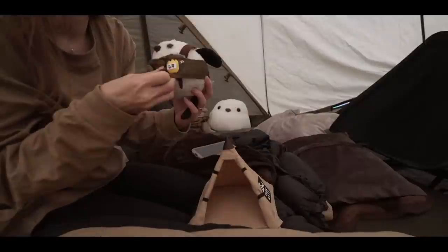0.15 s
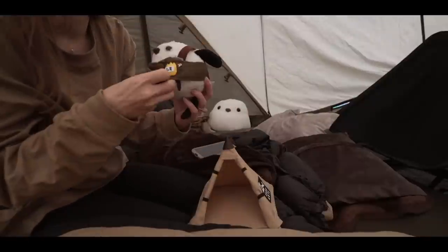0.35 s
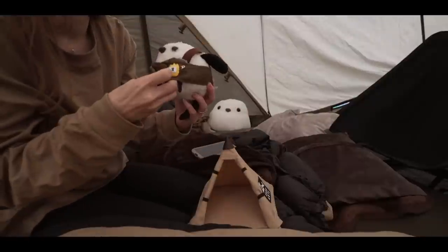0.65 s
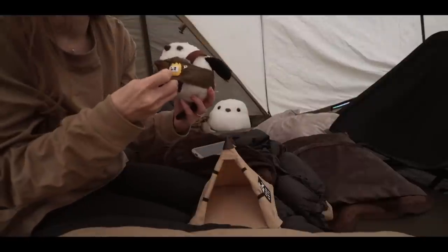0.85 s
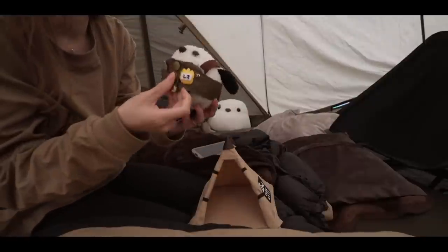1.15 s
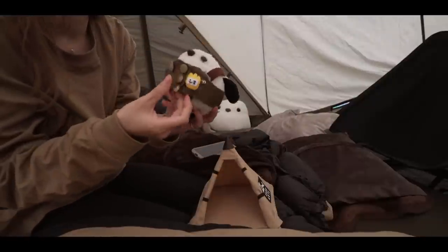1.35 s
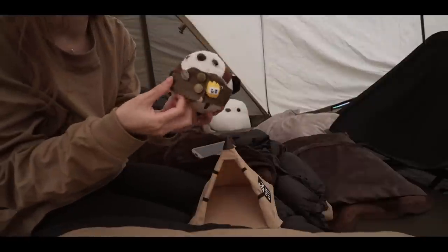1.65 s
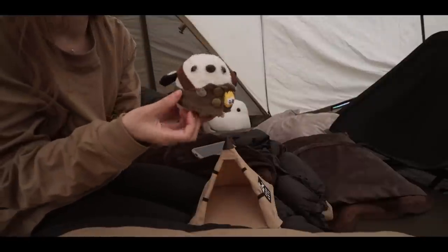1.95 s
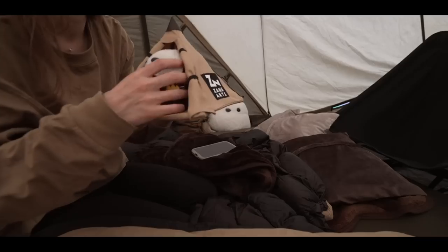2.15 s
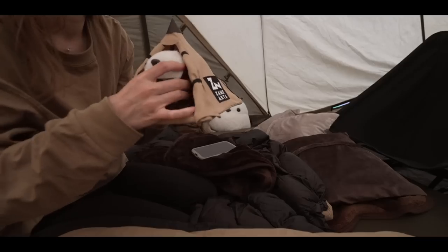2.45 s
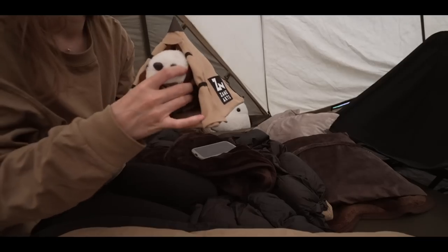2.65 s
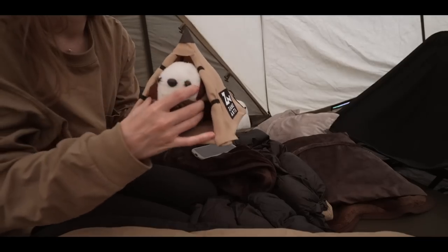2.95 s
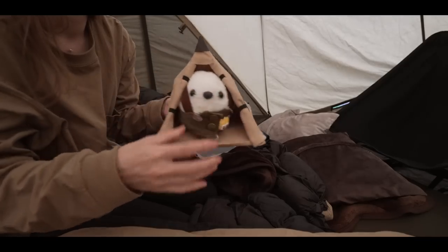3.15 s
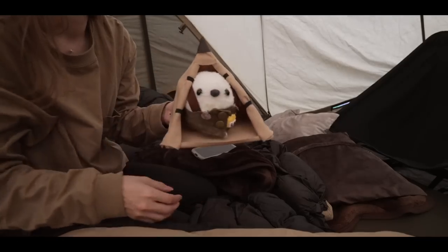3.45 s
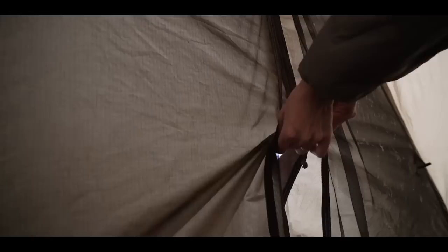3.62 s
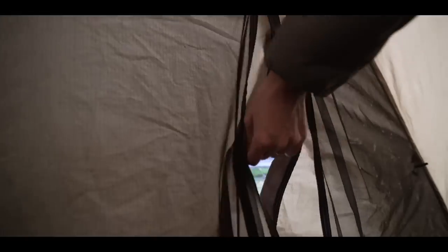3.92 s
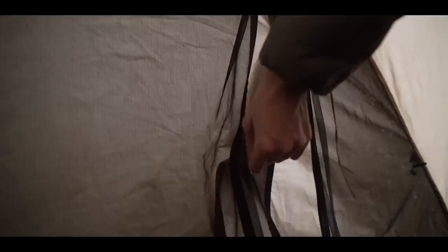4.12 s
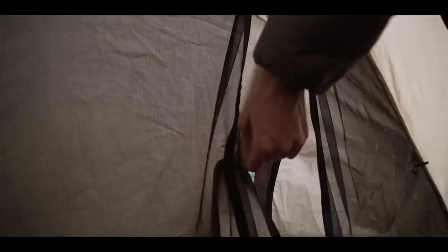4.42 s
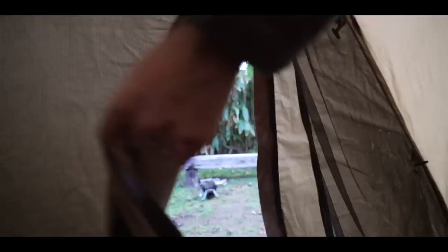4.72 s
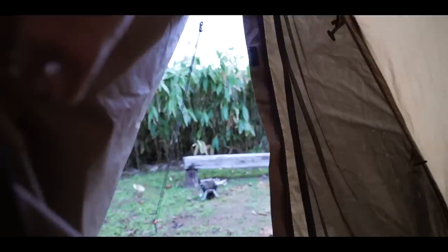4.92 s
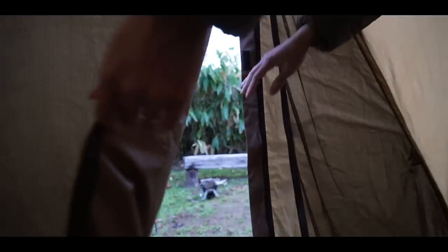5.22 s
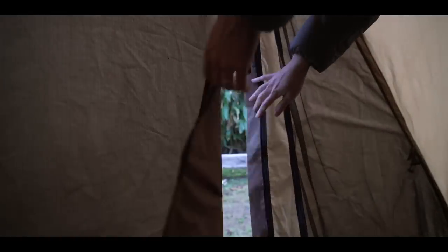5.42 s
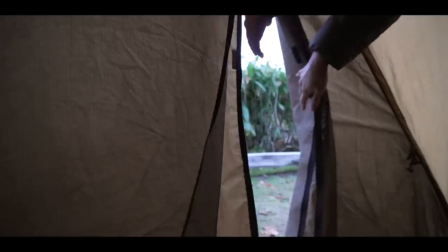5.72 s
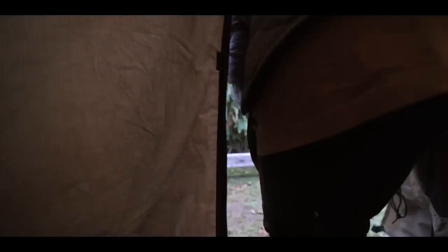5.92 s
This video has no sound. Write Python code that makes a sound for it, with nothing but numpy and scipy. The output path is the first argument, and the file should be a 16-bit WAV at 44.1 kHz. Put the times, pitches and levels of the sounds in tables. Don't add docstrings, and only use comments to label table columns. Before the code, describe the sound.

From 0 to 3.65 s it is very quiet inside a tent: a dull distant hum of traffic and leaves, faint soft rubs of fleece and sleeve, strongest at the very start and near 3.5 s, and one crisp plastic fastener snap at 0.76 s. Then the perspective cuts close to the door. From 3.67 s a few dull zipper knocks quicken into a buzz that climbs in pitch, peaks around 4.0 to 4.2 s with slider chatter and sharp snags, then drops and stops near 4.4 s. A metal pull tab jingles thinly at the start and end. At 4.5 to 4.65 s the flap is torn open in a loud cluster of nylon cracks and hiss. Afterwards sparse crease pops continue, busier at 5.4 to 5.7 s, with a brushing slide at 5.8 s. Low wind gusts flutter and thump to the end at about 6 s.

```python
import sys
import numpy as np
from scipy import signal
from scipy.io import wavfile
from scipy.ndimage import uniform_filter1d

SR = 44100
rng = np.random.default_rng(int(sys.argv[2]) if len(sys.argv) > 2 else 0)


def unload_audio(sound):
    columns = np.transpose(np.atleast_2d(sound))
    steps = np.round(np.clip(columns, -1, 1) * 32767)
    wavfile.write(sys.argv[1], SR, steps.astype(np.int16))


def volts(x):
    e = np.asarray(x, float) / 20
    return 10 ** e


N = 267687
T = np.arange(N) / SR
DOOR_S = 3.652

# time_s, tooth_rate_hz, pull_db, lowest_multiple_db
ZIP_STROKES = [
    [(3.745, 215.2, -8, 2.5), (3.766, 316.3, -6, 8.5), (3.782, 394, -16, -1), (3.81, 496, -6.5, 8),
     (3.856, 568, 2.5, -8), (3.888, 645.3, 3.5, 7.5), (3.96, 682, 6.5, -4.5), (3.998, 775.7, 0.5, 13),
     (4.008, 822.5, -3, -4)],
    [(4.008, 819.3, 0, -8), (4.034, 873, -1, 9.5), (4.055, 899, -0.5, -1), (4.068, 823.3, -4, 0),
     (4.088, 830.7, -1.5, 8.5), (4.15, 888.4, 4.5, -11.5), (4.174, 865.4, 4, 7), (4.2, 794, 5.5, -6)],
    [(4.2, 794, -1, 3), (4.218, 721.3, 4, -10), (4.244, 615.5, -1.5, 0.5), (4.266, 554, -6.5, 8),
     (4.294, 519.7, -1, 2.5), (4.314, 399, -9, -1), (4.33, 301.5, -7, 3.5), (4.37, 184, -4.5, -13)],
]
# time_s, crumple_db
NYLON_MOTION = [(3.652, -45.5), (3.78, -33.5), (3.85, -35.5), (3.88, -30.5), (3.97, -29.5), (4.15, -39.5),
                (4.4, -35), (4.413, -51), (4.492, -54), (4.497, -16.5), (4.52, -26), (4.62, -24.5),
                (4.69, -33.5), (4.9, -43.5), (5.33, -40.5), (5.38, -39), (5.8, -39.5), (6.07, -42.5)]


def curve(table, column, off=-120.):
    rows = np.array(table)
    return np.interp(T, rows[:, 0], rows[:, column], off, off)


def strokes(tables, column):
    return np.max([curve(table, column) for table in tables], axis=0)


def swells(rows, rise_s, fall_s, index=2):
    total = 0
    for row in rows:
        before = (row[0] - T) / rise_s
        after = np.maximum(T - row[0] - row[1], 0) / fall_s
        total = total + volts(row[index]) * np.exp(-np.maximum(before, after))
    return total


def unit(x):
    return x / np.sqrt(np.mean(x ** 2))


def ring(x, hz, width):
    centre = min(hz, .45 * SR)
    return signal.lfilter(*signal.iirpeak(centre, hz / width, fs=SR), x)


def walk(rate):
    k = int(SR / rate)
    held = np.repeat(rng.standard_normal(N // k + 1), k)
    return 1.3 * uniform_filter1d(uniform_filter1d(held, k), k)[:N]


def grains(rate, spread_db):
    chance, side, size = rng.random((3, N))
    return unit((chance < rate / SR) * np.sign(side - .5) * volts(-spread_db * np.log(size + .02)))


def coloured(colour, ticks, share, flicker_db, flicker_rate):
    hz, db = np.transpose(colour)
    out = 0
    for f in hz[0] * 2 ** np.arange(1 / 6, np.log2(hz[-1] / hz[0]), 1 / 3):
        edges = [f * 2 ** (-1 / 6), f * 2 ** (1 / 6)]
        sos = signal.butter(2, edges, "bandpass", fs=SR, output="sos")
        drive = np.sqrt(1 - share) * rng.standard_normal(N) + np.sqrt(share) * ticks
        level = np.interp(np.log(f), np.log(hz), db) + flicker_db * walk(flicker_rate)
        out = out + volts(level) * signal.sosfilt(sos, drive)
    return unit(out)


def rumble(hz, width):
    return unit(ring(ring(rng.standard_normal(N), hz, width), hz, width))


def outdoors():
    # pitch_hz, level_db (per Hz)
    far_colour = [(12, -11), (20, -1), (43, -17), (68, 2), (116, 2.5), (138, -7.5), (172, -4.5),
                  (216, -10.5), (319, -9.5), (718, -6.5), (1060, -9.5), (1400, -12.5), (2320, -24.5),
                  (3950, -27.5), (16000, -95)]
    # start_s, hold_s, level_db
    gust_times = [
        (3.7, 0.48, -37),
        (4.51, 0.2, -33),
        (4.92, 0.25, -36),
        (5.46, 0.15, -39.5),
        (5.72, 0.24, -38),
        (5.84, .03, -50),
    ]
    at_door = T > DOOR_S
    far = coloured(far_colour, np.zeros(N), 0, flicker_db=.9, flicker_rate=7)
    far = far * volts(-50.5 + 0.94 * at_door)
    flap_hz = 17.5 * (1 + .12 * walk(6))
    flutter = np.sin(2 * np.pi * np.cumsum(flap_hz) / SR) * volts(1.5 * walk(12))
    wind = flutter + volts(-14.5) * rumble(33, 22)
    gusts = swells(gust_times, rise_s=0.036, fall_s=0.11) * wind
    thump = volts(curve(NYLON_MOTION, 1) - 15.5) * rumble(115, 60)
    door_hum = volts(-52) * at_door * rumble(114, 16)
    return far + gusts + thump + door_hum


def hands():
    # start_s, hold_s, level_db
    rubs = [(0.0, 0.017, -48), (.05, .095, -55), (.368, 0.016, -63.5), (.5, .03, -66), (1.0, .08, -70.5),
            (1.245, .008, -68), (1.482, 0.006, -60.5), (2.025, 0.11, -59.5), (2.28, 0.0089, -59.5),
            (2.33, 0.061, -65.5), (2.46, 0.038, -67), (2.548, 0.022, -57.5), (2.786, .005, -64.5),
            (2.84, 0.056, -69), (3.04, 0.1, -58), (3.53, 0.017, -50.5), (3.58, 0.057, -58)]
    # pitch_hz, level_db (per Hz)
    cloth_colour = [(880, -6), (1500, -6), (1640, -5), (5120, -13), (6430, -14), (8920, -20.5),
                    (13400, -22.5), (16000, -33)]
    cloth = coloured(cloth_colour, grains(400, 3.0), .1, flicker_db=1.5, flicker_rate=20)
    return swells(rubs, rise_s=0.044, fall_s=0.01) * cloth


def snap():
    # time_s, peak_db
    click = [
        (0.758, -5),
    ]
    # pitch_hz, level_db, t60_s (time to fade by 60 dB)
    plastic_modes = [(1450, 9.5, 0.0035), (2590, 10.5, 0.0045), (4170, 15.5, 0.0031), (5530, 6, 0.0036),
                     (7100, -1, 0.003), (9900, -3, 0.0037), (13000, -12, 0.0034)]
    # pitch_hz, width_hz, level_db
    wall_tones = [(1800, 1100, -1), (3240, 750, 5), (4360, 600, 10), (6750, 970, -1), (10400, 2500, -8)]
    s, db = click[0]
    tick = np.zeros(N)
    for lag_s, gain in [(.0008, 0.34), (.00149, 1), (.00218, 0.15)]:
        tick[int((s + lag_s) * SR)] += gain
    modes = sum(volts(g) * ring(tick, hz, 2.4 / t60) * t60 for hz, g, t60 in plastic_modes)
    modes = signal.lfilter(*signal.butter(1, 8000, fs=SR), modes)
    noise = rng.standard_normal(N)
    tail = unit(sum(volts(g) * ring(noise, hz, width) for hz, width, g in wall_tones))
    since_s = np.maximum(T - s, 0)
    answer = volts(-29) * (since_s > .005) * np.exp(-since_s / 0.016) * tail
    return volts(db) * (modes / abs(modes).max() + answer)


def nylon():
    # pitch_hz, level_db (per Hz)
    body_colour = [(110, -56), (200, -2), (500, 2.5), (900, 2), (1600, -1.5), (2700, -9), (4200, -16.5),
                   (7000, -54)]
    # pitch_hz, level_db (per Hz)
    hiss_colour = [(1180, -43), (2000, -58), (2680, 6), (4920, 0.5), (5980, -3.5), (13300, -10.5),
                   (16100, -8), (16500, -53)]
    # start_s, hold_s, crumple_db, hiss_db
    yanks = [
        (4.015, .004, -27, -39),
        (4.4, 0.0025, -21.5, -27),
        (4.637, 0.0087, -18.5, -19),
    ]
    # start_s, hold_s, hiss_db
    slides = [
        (4.0, 0.088, -35.5),
        (4.18, 0.018, -35.5),
        (4.37, 0.019, -45),
        (4.52, .12, -37),
        (4.7, 0.19, -59),
        (4.9, 0.19, -63),
        (5.17, 0.036, -50.5),
        (5.35, .22, -58),
        (5.822, 0.074, -37.5),
        (5.97, 0.072, -49),
    ]
    ticks = unit(grains(410, 4.4) * volts(2 * walk(90)))
    body = coloured(body_colour, ticks, 0.76, flicker_db=2.04, flicker_rate=30)
    hiss = coloured(hiss_colour, ticks, 0.022, flicker_db=0.22, flicker_rate=30)
    moved = volts(curve(NYLON_MOTION, 1))
    yank_rise_s, yank_fall_s = .003, .004
    crumple = moved + swells(yanks, yank_rise_s, yank_fall_s)
    slide = swells(slides, rise_s=0.0013, fall_s=0.038)
    slide = slide + swells(yanks, yank_rise_s, yank_fall_s, index=3)
    return crumple * body + (volts(-12) * moved + slide) * hiss


def knocks(teeth):
    # time_s, peak_db
    first_teeth = [
        (3.6533, -44),
        (3.6735, -22),
        (3.7021, -24),
        (3.7185, -30),
        (3.727, -19.5),
        (3.7357, -20),
        (3.7405, -19),
    ]
    knock_hz, width_hz, fused_s = 850, 950, 3.778
    train = volts(-25) * teeth * (T > ZIP_STROKES[0][0][0]) * (T < fused_s)
    for s, db in first_teeth:
        train[int(s * SR)] += volts(db)
    soft = signal.butter(2, 1.23 * knock_hz, fs=SR)
    shape = signal.lfilter(*soft, ring(signal.unit_impulse(512), knock_hz, width_hz))
    return signal.fftconvolve(train, shape / shape.max())[:N]


def zipper():
    # pitch_hz, level_db
    tape = [(200, -28.5), (500, -33.5), (660, -32.5), (880, -33), (1300, -36.5), (1750, -39.5),
            (2050, -42.5), (3400, -42.5)]
    # start_s, hold_s, level_db
    chatter_times = [
        (3.86, 0.11, -38.5),
        (4.04, .28, -36),
    ]
    # pitch_hz, width_hz, level_db
    slider_tones = [(1360, 140, 10), (3610, 650, 12), (4840, 850, 9), (7500, 2000, -37), (12200, 4400, -22)]
    rate_hz = np.maximum(strokes(ZIP_STROKES, 1), 110)
    phase = np.cumsum(rate_hz * (1 + .025 * walk(200) + .01 * walk(50))) / SR
    pull_db = strokes(ZIP_STROKES, 2)
    tape_hz, tape_db = np.transpose(tape)
    buzz = 0
    for k in range(6):
        hz = (k + 1) * rate_hz
        db = pull_db + np.interp(np.log(hz), np.log(tape_hz), tape_db)
        db = db - 14 * np.maximum(np.log2(hz / tape_hz[-1]), 0)
        db = db - 3.0 * max(k - 3, 0)
        if k == 0:
            db = db + strokes(ZIP_STROKES, 3)
        waver_db = (.8 + .45 * k) * walk(40) + (1.5 + .4 * k) * walk(250)
        buzz = buzz + volts(db + waver_db) * np.sqrt(2) * np.sin(2 * np.pi * (k + 1) * phase + k)
    chance = rng.standard_normal((2, N))
    tooth = (np.diff(np.floor(phase), prepend=0) > 0) * volts(3.5 * chance[0])
    puff = np.exp(-(phase % 1) / 0.3) * chance[1]
    knock = .5 * unit(tooth) + unit(puff)
    chatter = 0
    for hz, width, db in slider_tones:
        chatter = chatter + volts(db) * ring(knock if hz < 4500 else puff, hz, width)
    chatter = swells(chatter_times, rise_s=.06, fall_s=0.049) * unit(chatter)
    return buzz + knocks(tooth) + chatter


def tab():
    # start_s, hold_s, low_ring_db, high_rings_db
    jingles = [
        (3.74, 0.014, -54, -47),
        (3.77, 0.034, -57, -75),
        (4.31, 0.031, -55, -42),
        (4.92, .006, -65, -52),
        (5.062, .008, -69, -66),
    ]
    # pitch_hz, width_hz, level_db
    metal_tones = [(6530, 80, 12), (10930, 120, -8.5), (15650, 120, -2)]
    low, *high = [volts(db) * unit(ring(grains(270, 2.8), hz, width)) for hz, width, db in metal_tones]
    rise_s, fall_s = 0.0083, 0.02
    low_gain = swells(jingles, rise_s, fall_s)
    high_gain = swells(jingles, rise_s, fall_s, index=3)
    return low_gain * low + high_gain * sum(high)


def cracks():
    # time_s, peak_db, pitch_hz, brightness_db
    snags = [(3.794, -1.5, 1450, -20.5), (3.8683, -11.5, 1200, -15.5), (3.8769, -12, 1020, -15),
             (3.9785, -15, 1450, -28), (4.0015, -4.5, 1230, -10), (4.0168, -7.5, 1190, -8),
             (4.019, -15, 2220, -16), (4.033, -5, 1450, -10), (4.0637, -1.5, 1430, -15),
             (4.0759, -7.5, 1330, -10), (4.119, -21, 1230, -10), (4.1834, -11, 1450, -10),
             (4.1971, -7.5, 1175, -14), (4.296, -15.5, 1270, -7), (4.3106, -12, 1580, -14),
             (4.3721, -7, 2403, -29), (4.377, -15, 2320, -9), (4.3851, -10.5, 1567, -9),
             (4.395, -6.5, 1260, -15.5), (4.3994, -15, 1540, -17)]
    # time_s, peak_db, pitch_hz, brightness_db
    tears = [(4.4507, -31, 1810, -5), (4.4954, -5, 2070, -14.5), (4.4995, -0.5, 3030, -29),
             (4.5012, 1.5, 1570, -8.5), (4.5061, 2, 1790, -9), (4.5091, -1, 1510, -16.5),
             (4.5257, -14, 1520, -33), (4.5362, -2, 1900, -13), (4.5406, -6, 688, -11),
             (4.5513, -12, 600, -11), (4.5716, -7, 890, -14), (4.589, -12, 1400, -11.5),
             (4.6, -15.5, 1200, -8), (4.608, -18, 900, -9), (4.6205, -8, 1500, -6),
             (4.628, -7.5, 1500, -11), (4.6363, -6.5, 1450, -5), (4.6395, -24, 700, -4),
             (4.6439, -11, 1300, -10), (4.6505, -14, 1370, -23)]
    # time_s, peak_db, pitch_hz, length_ms
    creases = [(4.725, -20, 1310, 2.5), (4.7563, -19.5, 2860, 2.5), (4.7908, -22.5, 1110, 1.7),
               (4.799, -24, 1680, 2.5), (4.8219, -21.5, 1360, 3.7), (4.88, -24.5, 975, 1.9),
               (4.962, -24.5, 1500, 8.5), (5.0865, -23, 1250, 4), (5.166, -28, 980, 2.9),
               (5.387, -22.5, 920, 4.8), (5.4057, -21, 850, 6), (5.4167, -20.5, 1150, 3),
               (5.4424, -19, 1670, 2), (5.526, -12.5, 1310, 0.96), (5.5348, -11, 1300, 3.5),
               (5.564, -19.5, 1100, 8.5), (5.5739, -20, 1420, 7.3), (5.5913, -21, 1290, 4),
               (5.627, -27, 1280, 3.2), (5.6456, -11.5, 1650, 1.2), (5.652, -16.5, 1360, 3.6),
               (5.6717, -24, 2030, 4.8), (5.7211, -23, 1690, 4.4), (5.7834, -19, 1020, 2.2),
               (5.9297, -28, 1260, 2.5), (6.0331, -21.5, 1450, 6.9)]
    rows = [(*row, 3.2) for row in snags] + [(*row, 2.54) for row in tears]
    rows += [(s, db, hz, -26.5, ms) for s, db, hz, ms in creases]
    size = 4096
    out, t = np.zeros(N + size), np.arange(size) / SR
    for s, db, hz, bright_db, ms in rows:
        noise = rng.standard_normal((3, size))
        fade = np.exp(-t * 1000 / np.clip(0.67 * ms, .2, 20))
        push = 0.086 * noise[0] * fade * volts(4.4 * noise[1])
        push[0] = -1
        soft = signal.butter(2, 2.6 * hz, fs=SR)
        low = ring(signal.lfilter(*soft, push), hz, 0.46 * hz)
        edge_hz = np.clip(9000 + 230 * bright_db, 3000, 12000)
        high = ring(ring(noise[2] * fade, 3600, 2700), edge_hz, edge_hz)
        high = high + volts(0.65 * bright_db - 5.0) * ring(noise[0] * fade, 12000, 5600)
        drum = ring(ring(push, 380, 1100), 520, 1400)
        crack = unit(low) + volts(bright_db + 9.0) * unit(high) + volts(-7.5) * unit(drum)
        wash = ring(signal.lfilter(*soft, noise[1]), hz, 4.3 * hz)
        wash = wash * volts(-19.5) * np.exp(-t / 0.016)
        i = int(s * SR)
        out[i:i + size] += volts(db) * (crack / abs(crack).max() + wash)
    return out[:N]


def scene():
    mic_hiss = volts(-71.5) * ring(rng.standard_normal(N), 4600, 6800)
    before_zip = outdoors() + hands() + snap()
    at_door = nylon() + zipper() + tab() + cracks()
    return (before_zip + at_door + mic_hiss)[None]


def band_limit(x):
    return signal.sosfilt(signal.butter(12, 17000, fs=SR, output="sos"), x)


def record(dry):
    rounded = .95 * np.tanh(dry / .95)
    top_cut = signal.ellip(8, .2, 45, 15720, fs=SR, output="sos")
    finished = signal.sosfilt(top_cut, rounded)
    return band_limit(finished)


dry = scene()
out = record(dry)
unload_audio(out)
```